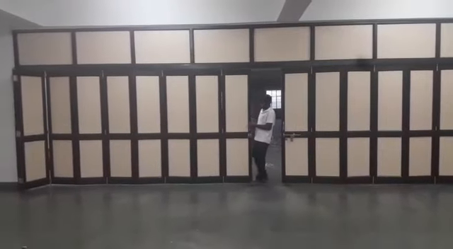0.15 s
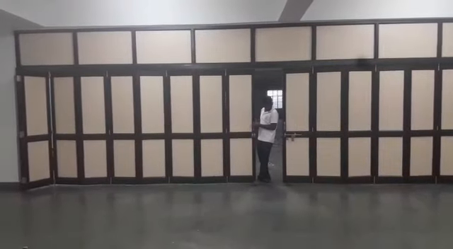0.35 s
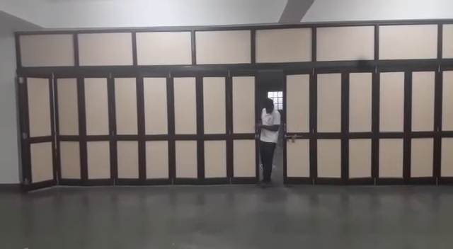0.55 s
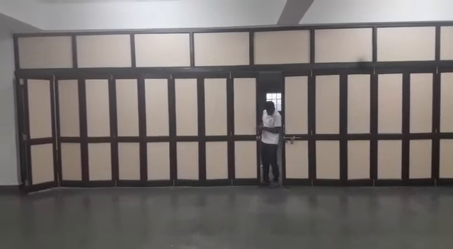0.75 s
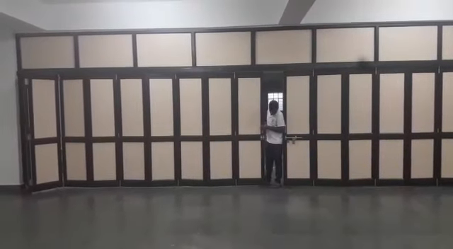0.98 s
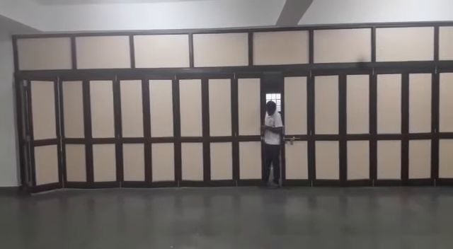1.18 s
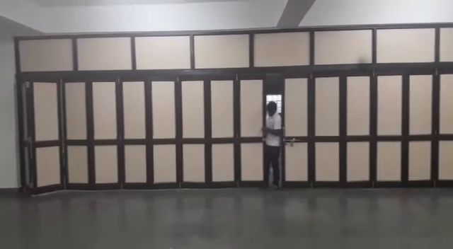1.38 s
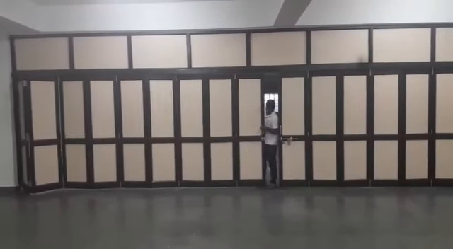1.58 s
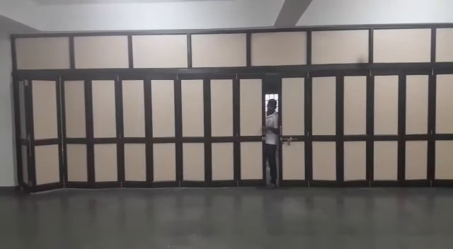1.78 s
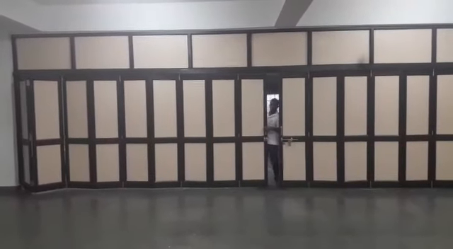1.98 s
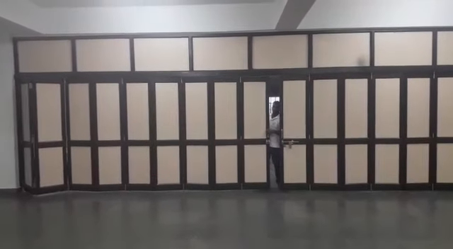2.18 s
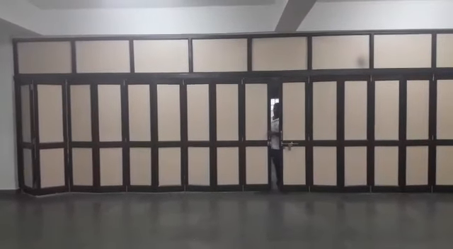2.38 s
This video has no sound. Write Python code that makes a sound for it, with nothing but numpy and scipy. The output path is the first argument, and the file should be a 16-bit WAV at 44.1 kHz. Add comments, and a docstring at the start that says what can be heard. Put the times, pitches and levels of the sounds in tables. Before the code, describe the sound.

Folding wooden door panels roll with a low rumble, heard from far across a large empty hall. At about 0.2 seconds a metal fitting clacks and rings. Around 0.7 seconds the panels slam into line in a loud, quick chatter of knocks, which echoes away until about 2 seconds. A faint, bright scrape rises near 2.4 seconds. Steady low room noise lies underneath throughout.

```python
"""A large empty hall: a wall of folding wooden door panels is drawn shut, heard from far away.
Over a steady wash, the panels rumble along their track and start to scrape at the end.
A metal fitting clacks, then the panels slam into line and chatter. Each contact is a click plus
ringing modes, and the bare walls ring on after it. Gain control ducks at the slam and slowly recovers."""
import sys
import numpy as np
from scipy import signal
from scipy.fft import rfft, irfft, next_fast_len
from scipy.io import wavfile
from scipy.ndimage import uniform_filter1d, minimum_filter1d

SR = 44100
rng = np.random.default_rng(int(sys.argv[2]) if len(sys.argv) > 2 else 0)


def log_audio(samples):
    """Write samples as a 16-bit WAV file to the path given in sys.argv[1]."""
    # one column per channel
    frames = np.atleast_2d(samples).T
    # limit to full scale, then quantise
    limited = np.clip(frames, -1, 1)
    pcm = np.round(limited * 32767).astype(np.int16)
    wavfile.write(sys.argv[1], SR, pcm)


N = 108045
FFT_SIZE = 2 * next_fast_len(N)
TIME_S, BIN_HZ = np.arange(N) / SR, np.fft.rfftfreq(FFT_SIZE, 1 / SR)


def amp(db):
    """Decibels to gain."""
    return 10 ** (np.asarray(db) / 20)


def unit_energy(x):
    """Scale to energy 1."""
    return x / np.sqrt(np.sum(x ** 2) + 1e-20)


def along(points, hz):
    """(Hz, value) points read on a log axis."""
    point_hz, values = np.transpose(points)
    return np.interp(np.log(hz + 1), np.log(point_hz + 1), values)


def swell(points):
    """(s, dB) points as a gain per sample."""
    return amp(np.interp(TIME_S, *np.transpose(points)))


def fade(t, t60_s):
    """Exponential decay, 60 dB down at t60_s."""
    return np.exp(-np.log(1000) * t / t60_s)


def coloured(x, colour, tilt_db_per_oct=0, top_hz=np.inf):
    """Minimum-phase filter: (Hz, dB) colour, tilted about 2 kHz, rolled off above top_hz."""
    octaves = np.log2(np.clip(BIN_HZ, 400, 8000) / 2000)
    roll_off = 1 / np.sqrt(1 + (BIN_HZ / top_hz) ** 8)
    gain = amp(along(colour, BIN_HZ) + tilt_db_per_oct * octaves) * roll_off
    cepstrum = irfft(np.log(gain))
    cepstrum[1:FFT_SIZE // 2] *= 2  # fold onto positive time: causal
    cepstrum[FFT_SIZE // 2 + 1:] = 0
    return irfft(rfft(x, FFT_SIZE) * np.exp(rfft(cepstrum)))[:N]


def noise(colour):
    """Coloured noise of rms 1."""
    return np.sqrt(N) * unit_energy(coloured(rng.standard_normal(N), colour))


# Wash spectrum. Each row: frequency in Hz, relative level in dB.
WASH_COLOUR = [(20, -32), (38, -25), (52, -3.5), (95, 1.5), (130, 3), (210, 2), (300, 1), (520, -4.5),
               (750, -5.5), (1200, -6), (1600, -8), (2000, -6.5), (2700, -12), (3400, -18.5), (6000, -27.5),
               (8000, -40.5), (16000, -55)]


def hall_wash(level_db=-30):
    """Steady low noise of the empty hall."""
    return amp(level_db) * noise(WASH_COLOUR)


# Rumble envelope. Each row: time in seconds, level in dB.
RUMBLE_ENVELOPE = [(0, -32), (.2, -29), (.6, -25), (.9, -63), (1.4, -45), (2.0, -63), (2.45, -62)]
# Rumble spectrum. Each row: frequency in Hz, relative level in dB.
RUMBLE_COLOUR = [(20, -33), (36, -23), (50, -0.5), (100, -3.5), (140, 3.5), (260, 0), (330, -12), (420, -6),
                 (800, -11), (2000, -33.5), (6000, -45)]


def track_rumble():
    """The panels roll along their track: low noise that swells and sinks."""
    return swell(RUMBLE_ENVELOPE) * noise(RUMBLE_COLOUR)


# Hall reverberation. Each row: frequency in Hz, t60 in seconds.
HALL_DECAY = [(60, 3.1), (150, 2.56), (500, 2.89), (1000, 2.74), (2000, 2.096), (4000, 1.81), (6000, 1.34),
              (8000, 0.94), (12000, 0.76), (15000, 0.62)]


def hall(x, rattle_t60_s, rattle_db):
    """The struck object's own dense rattle first, laid alongside the hall's single wall echoes and a long tail
    whose treble dies first."""
    tail_rise_s, rattle_rise_s, echoes_db = .0046, .0012, -14
    hz, frame_s, spectrum = signal.stft(rng.standard_normal(N), SR, nperseg=512)
    spectrum *= fade(frame_s, along(HALL_DECAY, hz)[:, None])
    tail = signal.istft(spectrum, SR)[1][:N] * (1 - np.exp(-TIME_S / tail_rise_s))
    rattle = rng.standard_normal(N) * (1 - np.exp(-TIME_S / rattle_rise_s)) * fade(TIME_S, rattle_t60_s)
    response = unit_energy(tail) + amp(rattle_db) * unit_energy(rattle)
    echo_s = rng.uniform(.002, .045, size=10)
    response[(echo_s * SR).astype(int)] += amp(echoes_db) * unit_energy(rng.standard_normal(len(echo_s)))
    return signal.fftconvolve(x, response)[:N]


def knocks(contacts, colour, modes, ring_db, rattle_t60_s, rattle_db):
    """Each contact is a coloured click plus ringing modes, and excites the hall anew."""
    t, out = np.arange(SR) / SR, np.zeros(N)
    for start_s, level_db, tilt_db_per_oct, top_hz in contacts:
        knock = coloured(signal.unit_impulse(N), colour, tilt_db_per_oct, top_hz)
        ring = np.zeros(SR)
        for hz, mode_db, t60_s in modes:
            gain = amp(mode_db + rng.normal(0, 1.5))
            tone = np.sin(2 * np.pi * (hz * t + rng.random()))
            ring += gain * unit_energy(tone * fade(t, t60_s))
        knock[:SR] += amp(ring_db) * unit_energy(ring)
        start = round(start_s * SR)
        out[start:] += amp(level_db) * hall(knock, rattle_t60_s, rattle_db)[:N - start]
    return out


# Fitting contacts. Each row: start in seconds, relative level in dB, tilt in dB/octave, click top in Hz.
FITTING_CONTACTS = [(.2035, -32.5, 19, 6500), (.2105, -21, 11, 14000), (.220, -4.5, 3, 14000),
                    (.2255, -1.5, -4, 14000)]
# Fitting click spectrum. Each row: frequency in Hz, gain in dB.
FITTING_COLOUR = [(30, -15), (100, -11), (220, 1.5), (350, -6), (500, -1.5), (800, -7), (1200, 5.5),
                  (1600, -3), (2100, 3.5), (2900, 1.5), (4600, -7.5), (5650, -3), (7000, -10), (8300, -9.5),
                  (10500, -16), (12500, -0.5), (15500, -13)]
# Fitting modes. Each row: frequency in Hz, relative level in dB, t60 in seconds.
FITTING_MODES = [(1160, -8.5, 0.24), (2060, 2, .3), (2480, -6, 0.42), (2805, -13, .3), (5370, -5, .6),
                 (5700, -3.5, .7), (5520, -12, .9), (5800, -11, .8), (5840, -13, .8)]


def fitting_clack(gain_db=18.5):
    """The metal fitting touches lightly, then clacks home."""
    return amp(gain_db) * knocks(FITTING_CONTACTS, FITTING_COLOUR, FITTING_MODES,
                                 ring_db=-16, rattle_t60_s=.045, rattle_db=-4.5)


# Panel contacts. Each row: start in seconds, relative level in dB, tilt in dB/octave, click top in Hz.
PANEL_CONTACTS = [(.670, -14.5, -1, 2910), (.6885, -1.5, -1, 12000), (.693, -0.5, -0.5, 15800),
                  (.703, 0.5, 0.5, 16200), (.721, 0.5, 0.5, 16000), (.749, -1, -1.5, 15000),
                  (.776, -0.5, -1.5, 14000), (.803, -4, -2.5, 9050)]
# Panel click spectrum. Each row: frequency in Hz, gain in dB.
PANEL_COLOUR = [(25, -69), (55, -7), (100, -9.5), (130, -0.5), (165, -1), (210, 3.5), (295, -3),
                (430, -1.5), (560, 0), (700, -5.5), (1050, -5.5), (1600, -3.5), (1750, -4.5), (1950, 0.5),
                (2350, -2.5), (2650, -0.5), (3350, -9), (4000, -5.5), (5300, -8), (6600, -11.5),
                (9000, -16.5), (15500, 0)]
# Panel frame modes. Each row: frequency in Hz, relative level in dB, t60 in seconds.
FRAME_MODES = [(128.7, -7, 0.41), (205.6, -5.5, 0.62), (365.4, -7, .3), (423, -1, 0.31), (530, -3.5, 1),
               (600, -7.5, 0.86), (1191, -9, 0.62), (1577, -8.5, 0.21), (1883, -4, 0.078), (1974, -3, .25),
               (2240, -14.5, 0.28), (2406, -6, 0.43), (2596, -1, 0.086), (2741, -13, 0.71), (3050, -6, 0.2),
               (3948, -6.5, 0.22), (5300, -8, .2), (6640, -10.5, 0.13)]


def panel_slam(gain_db=31):
    """The panels slam into line one after another; their frames ring."""
    return amp(gain_db) * knocks(PANEL_CONTACTS, PANEL_COLOUR, FRAME_MODES,
                                 ring_db=-16.5, rattle_t60_s=.18, rattle_db=-2)


# Scrape envelope. Each row: time in seconds, level in dB.
SCRAPE_ENVELOPE = [(2.0, -67), (2.25, -57), (2.37, -48), (2.42, -39), (2.45, -43)]
# Scrape spectrum. Each row: frequency in Hz, relative level in dB.
SCRAPE_COLOUR = [(100, -20), (1500, -3), (3000, -4), (4300, -2), (5800, 9), (7500, -4), (11000, -1),
                 (16000, 4)]


def track_scrape():
    """The panels scrape on the track: bright noise that rises at the end."""
    return swell(SCRAPE_ENVELOPE) * noise(SCRAPE_COLOUR)


def scene():
    """The door over the wash of the hall, mono."""
    door = fitting_clack() + panel_slam() + track_rumble() + track_scrape()
    return (door + hall_wash())[None]


# Microphone response. Each row: frequency in Hz, gain in dB.
MIC_RESPONSE = [(20, -12), (36, -15), (48, -5), (6600, 3), (7100, -2.5), (7700, -10.5), (8400, -18),
                (9500, -20), (11300, -19), (13500, -30), (15500, -29)]
# Hiss spectrum. Each row: frequency in Hz, relative level in dB.
HISS_COLOUR = [(100, -11), (9000, -11), (12000, -2), (15000, 1.5)]


def record(dry):
    """Dull microphone, faint hiss, gain control that ducks fast and recovers slowly, limiter, low-pass."""
    hiss_db, ceiling, top_hz = -68, .97, 15800
    detect_s, threshold_db, recover_db_per_s = .04, -10.5, 3
    x = coloured(dry[0], MIC_RESPONSE) + amp(hiss_db) * noise(HISS_COLOUR)
    power = np.abs(uniform_filter1d(x ** 2, int(detect_s * SR)))
    excess_db = np.maximum(10 * np.log10(power + 1e-12) - threshold_db, 0)
    recovery_db = recover_db_per_s * TIME_S
    duck_db = np.maximum.accumulate(excess_db + recovery_db) - recovery_db  # peak hold, linear release
    x *= amp(-duck_db)
    limiter_gain = np.minimum(1, ceiling / (np.abs(x) + 1e-9))
    x *= uniform_filter1d(minimum_filter1d(limiter_gain, size=65), size=65)
    return irfft(rfft(x, FFT_SIZE) * (BIN_HZ < top_hz))[None, :N]


dry = scene()
out = record(dry)
log_audio(out)
```